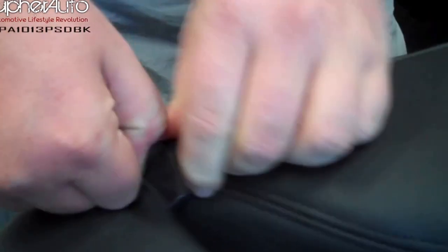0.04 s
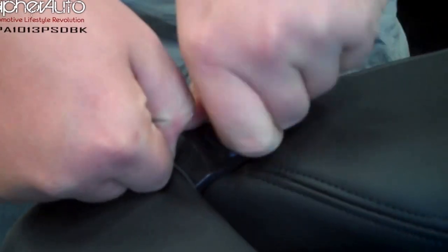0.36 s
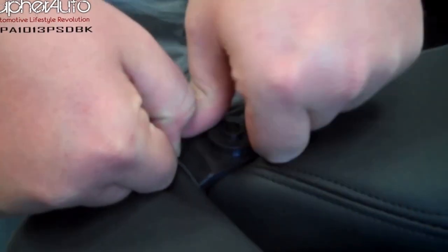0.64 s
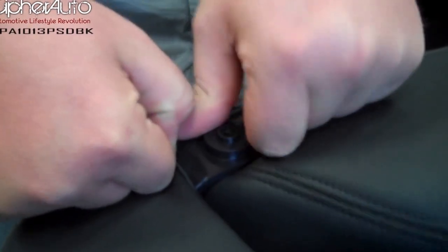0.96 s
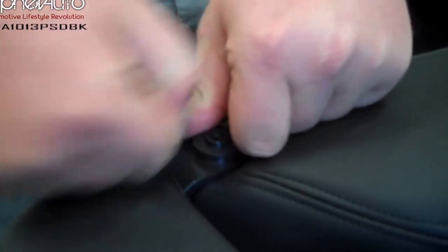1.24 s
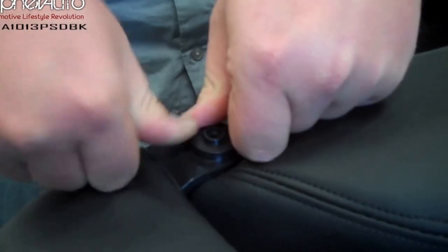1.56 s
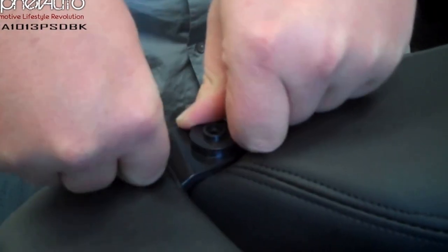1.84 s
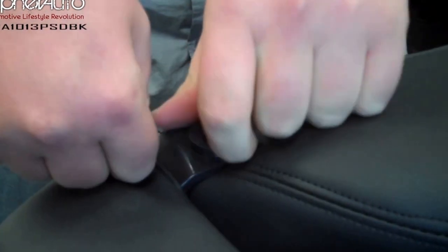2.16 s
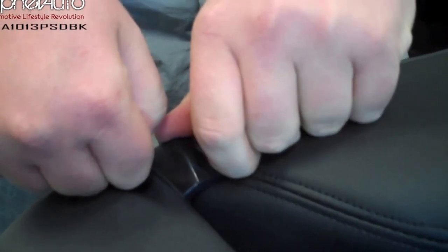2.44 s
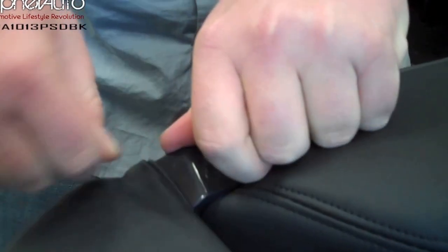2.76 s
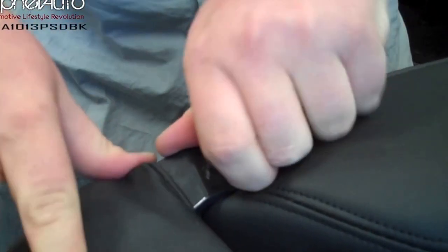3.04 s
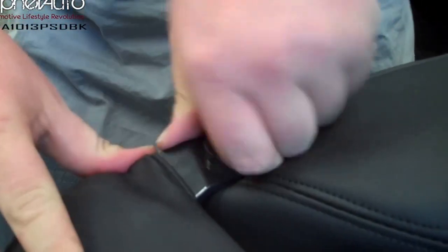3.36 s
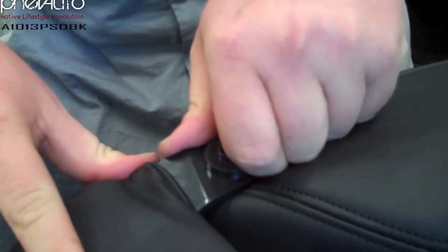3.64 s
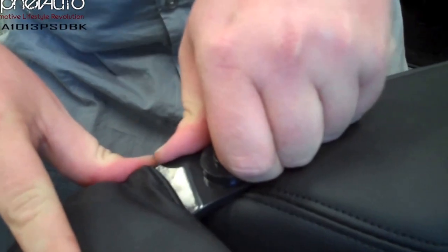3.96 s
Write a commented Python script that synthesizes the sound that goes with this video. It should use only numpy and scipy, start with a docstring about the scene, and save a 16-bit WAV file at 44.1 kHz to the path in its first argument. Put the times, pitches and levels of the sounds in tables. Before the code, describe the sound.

Fingers rubbing and tugging a vinyl seat cover, with dry creaks, ticks and snaps.

```python
"""A quiet room, close on a car seat: two hands stretch a vinyl cover over it, by a small stereo mic.
Skin and vinyl stick and slip: single ticks, and creaks where the slips run together.
Each slip briefly rings the gripped patch. When the grip gives way the cover snaps onto the foam
and the fingers slide off with a dry hiss. Soft room tone and a faint mains hum lie underneath."""
import sys
import numpy as np
from scipy import signal
from scipy.fft import rfft, irfft
from scipy.io import wavfile

SR = 44100
rng = np.random.default_rng(int(sys.argv[2]) if len(sys.argv) > 2 else 0)


def generate_wav(signal):
    """Clip the signal to [-1, 1] and save it as 16-bit WAV at the path in sys.argv[1]."""
    frames = np.transpose(np.atleast_2d(signal))
    scaled = np.clip(frames, -1, 1) * 32767
    pcm = np.round(scaled).astype(np.int16)
    wavfile.write(sys.argv[1], SR, pcm)


N = 176400

# Single slips of skin on vinyl. Levels here and below are relative; tick_db is on top of level_db.
# start_s, level_db, tick_db, grip
SINGLE_SLIPS = [ (0.016, -34, -7, "thumb"), (0.6525, -21, -14.5, "taut"), (0.7374, -26.5, -5, "taut"),
                (.7910, -21, -11, "tug"), (0.8029, -16.5, -14, "tug"), (0.8192, -19, -13, "tug"),
                (0.9406, -19.5, -5.5, "fold"), (0.9543, -22, -1, "fold"), (0.968, -22.5, -2, "fold"),
                (1.004, -23, -7.5, "pinch"), (1.0367, -22.5, -10.5, "pinch"), (1.106, -16, -20, "fingers"),
                (1.2051, -24.5, -17, "fingers"), (1.2779, -22.5, -18, "pinch"), (1.4189, -25, -3, "edge"),
                (1.6181, -32, -15, "edge"), (1.6489, -32.5, 5, "thumb"), (1.6859, -29.5, 3.5, "thumb"),
                (1.7373, -28, -1.5, "thumb"), (1.9474, -30.5, 5, "fingers"), (2.2072, -45, 15.5, "thumb"),
                (2.2827, -30.5, -8.5, "taut"), (2.3004, -25, -8.5, "taut"), (2.3454, -27, -9, "taut"),
                (2.3665, -28, -10, "taut"), (2.9525, -36, 0.5, "thumb"), (3.0610, -25, -1.5, "thumb"),
                (3.443, -43.5, 6.5, "thumb"), (3.7751, -38, 5.5, "thumb"), (3.7910, -33.5, 0, "thumb"), ]

def ticks():
    """Under a slow pull the slips come one at a time."""
    out = np.zeros(N)
    for start, level_db, tick_db, grip in SINGLE_SLIPS:
        add(out, start, undb(level_db) * flutter(slip(grip, tick_db)))
    return out


# Runs of slips, each gliding through three slip rates.
# start_s, end_s, first_rate_hz, middle_rate_hz, last_rate_hz, level_db, tick_db, grip
CREAK_RUNS = [ (0.07, 0.0908, 379, 439.7, 304, -31, -6.5, "fingers"),
              (0.0933, 0.132, 187.3, 259, 144.7, -30.5, -4.5, "fingers"),
              (0.149, 0.1943, 99.6, 125.8, 287.5, -26.5, -10, "fingers"),
              (0.198, 0.247, 420, 398, 301, -35.5, -25, "fingers"),
              (0.3305, 0.3734, 194, 221, 276, -33, 0, "fingers"),
              (.6683, .7230, 112.3, 193.4, 167, -25, -9.5, "taut"),
              (1.0134, 1.0278, 156.6, 154, 151.4, -21, -11.5, "pinch"),
              (1.0961, 1.1525, 275.4, 422, 182.4, -25, -11, "pinch"),
              (1.9000, 1.9330, 114.3, 155, 77.5, -34, -6.5, "thumb"),
              (2.3958, 2.4416, 99.74, 72, 109.3, -28, -8.5, "taut"),
              (2.4508, 2.5100, 191.5, 191.8, 235, -29.5, -11, "stretched"),
              (3.119, 3.125, 422.7, 454, 420, -30.5, -8, "fingers"),
              (3.202, 3.2407, 203.2, 174.2, 82.6, -31, -7.5, "thumb"),
              (3.279, 3.316, 117.9, 160, 132.6, -28.5, -3, "thumb"),
              (3.337, 3.3544, 102, 91.5, 86, -32, -0.5, "thumb"),
              (3.608, 3.6500, 238, 158.1, 114.3, -28.5, -7.5, "flat"),
              (3.656, 3.6963, 226, 327.8, 240.9, -31.5, -7, "flat"),
              (3.7002, 3.749, 135, 72.3, 65.3, -35, -8.5, "flat"), ]

def creaks(gap_scatter=.04, size_scatter_db=.5, stick_power=.26):
    """Under a faster pull the slips run together, at a rate that follows the hand's speed."""
    out = np.zeros(N)
    for start, end, first, middle, last, level_db, tick_db, grip in CREAK_RUNS:
        t = np.linspace(start, end, 200)
        rate = np.interp(t, np.linspace(start, end, 3), [first, middle, last])
        cycles = np.cumsum(rate) * (t[1] - t[0])
        count = max(int(round(cycles[-1])), 1) + 1
        gap_jitter, size_jitter = rng.standard_normal((count, 2)).T
        times = np.interp(np.linspace(0, cycles[-1], count) + gap_scatter * gap_jitter, cycles, t)
        stick = rate.mean() / np.interp(times, t, rate)  # a longer stick gives a stronger slip
        sizes = stick ** stick_power * undb(level_db + size_scatter_db * size_jitter)
        for at, size in zip(times, sizes):
            add(out, at, size * flutter(slip(grip, tick_db)))
    return out


# The cover snapping free: a crack over a low thud.
# start_s, crack_db, tick_db, thud_db, thud_pitch_hz
COVER_SNAPS = [(1.1619, -19, -12.5, -22, 700), (1.1642, -19.5, -9, -32, 242), (1.1784, -26, 6.5, -43, 171),
               (2.5158, -33, 5, -42, 431.5), (2.517, -21.5, -16, -32.5, 364),
               (2.5328, -24, -14, -39, 201.5), (2.5375, -23, -3.5, -44, 358)]

def snaps(thud_trim_db=-6.5):
    """The grip lets go: the cover cracks and thuds onto the foam."""
    out = np.zeros(N)
    for start, crack_db, tick_db, thud_db, thud_hz in COVER_SNAPS:
        resonance = ring(thud_hz, width_hz=220)
        thud = signal.fftconvolve(resonance, resonance)[:len(resonance)]  # twice, for steep flanks
        add(out, start, undb(crack_db) * flutter(slip("fingers", tick_db)))
        add(out, start, undb(thud_db + thud_trim_db) * thud / strength(thud))
    return out


# Resonances of the vinyl patch, a set for each way of holding it.
# pitch_hz, width_hz, level_db
GRIP_RESONANCES = { "fingers": [(586, 860, -11), (1020, 470, -6), (2610, 1780, 1)], "taut": [(993, 620, -1),
                   (1660, 560, -1.5), (2560, 990, -1.5)], "stretched": [(948.5, 665, -3), (1940, 1050, 1),
                   (4740, 4500, -12)], "tug": [(1000, 640, -7.5), (1700, 780, -7), (2690, 790, 1.5)],
                   "fold": [(855.7, 640, -6.5), (1490, 1060, 7.5), (2970, 650, 8.5), (4160, 750, 0)],
                   "pinch": [(663, 750, -22), (1100, 1270, -5.5), (2750, 840, 8), (3713, 1100, -4.5)],
                   "thumb": [(650, 600, 2), (1000, 470, 6.5), (1720, 440, 1.5), (2730, 2140, 0.5)],
                   "flat": [(700, 560, 0), (980, 686, 1), (3020, 1010, 1.5)], "edge": [(735, 1000, -8.5),
                   (2187, 1120, 3)], }

def patch(grip, tension_scatter=.047, size=1024):
    """Dry knock of the gripped patch: broad resonances that shift with the tension of the moment."""
    tuning = 1 + tension_scatter * rng.standard_normal()  # a little tighter or slacker each time
    f = np.maximum(np.fft.rfftfreq(size, 1 / SR), 10) / tuning
    pitch_hz, width_hz, level_db = np.array(GRIP_RESONANCES[grip]).T[:, :, None]
    detune = (f - pitch_hz ** 2 / f) / width_hz
    knock = causal(np.linalg.norm(undb(level_db) / (1 + detune ** 2), axis=0))
    swell = np.prod((1 - 1j * detune) / (1 + 1j * detune), axis=0)  # all-pass: each resonance blooms
    return irfft(rfft(knock) * swell)


def slip(grip, tick_db, trim_db=-6, low_cut_hz=158):
    """One release of the contact: a sharp tick and the short ring of the patch."""
    body = bend(patch(grip), lag_s=.00019)
    tick = bend(ring(8400, width_hz=7200, size=len(body)), lag_s=.001597)
    sound = (body + undb(tick_db) * tick) / strength(body)
    return undb(trim_db) * signal.lfilter(*signal.butter(1, low_cut_hz, "high", fs=SR), sound)


def bend(x, lag_s):
    """Bending waves in the sheet: the treble arrives first, the lows later; lag_s holds at 1 kHz."""
    turns = 2 * lag_s * np.sqrt(1000 * np.fft.rfftfreq(len(x), 1 / SR))
    return irfft(rfft(x) * np.exp(-2j * np.pi * turns))


def flutter(x, decay_s=.0016, level_db=-7, size=256):
    """The sheet shivers for a moment, differently after each slip."""
    shiver = rng.standard_normal(size) * np.exp(-np.arange(size) / SR / decay_s)
    response = signal.unit_impulse(size) + undb(level_db) * shiver / np.linalg.norm(shiver)
    return np.convolve(x, response)[:len(x)]


# Tone of sliding skin: a bright hiss and a darker rasp.
# frequency_hz, gain_db
HISS_EQ = [(150, -26.5), (1500, -3.5), (3500, -3.5), (6500, 8), (10000, 4.5), (14000, -5.5)]
RASP_EQ = [(200, -19), (600, 0.5), (1000, 2.5), (1700, -3.5), (3000, 0), (6000, -14)]
# Finger strokes across the cover, each swelling and fading; the short burst at 2.5138 s is the grainy crack of
# the cover snapping free. # start_s, loudest_s, end_s, hiss_db, rasp_db
STROKES = [ (-.08, 0.06, 0.23, -54, -55), (0.156, 0.22, 0.27, -42.5, -45.5),
           (0.209, 0.265, 0.2845, -36, -75), (0.265, 0.287, 0.43, -52, -56.5),
           (0.319, 0.348, 0.395, -51.5, -49), (0.405, 0.495, 0.52, -45.5, -51.5),
           (1.154, 1.177, 1.21, -37, -42), (1.529, 1.528, 1.556, -49.5, -62), (1.59, 1.643, 1.72, -50, -58),
           (1.701, 1.718, 1.816, -50, -57), (1.809, 1.913, 2, -59.5, -61),
           (1.904, 2.08, 2.096, -44.5, -58.5), (2.073, 2.073, 2.35, -48, -65.5),
           (2.5138, 2.5146, 2.522, -26.5, -50), (2.505, 2.568, 2.66, -43.5, -44),
           (2.78, 2.835, 2.862, -51, -61), (2.86, 2.888, 2.92, -54, -65), (2.935, 2.98, 3.07, -52, -48.5),
           (3.068, 3.072, 3.2, -43.5, -51), (3.15, 3.2, 3.285, -43.5, -50), (3.26, 3.31, 3.38, -48, -52),
           (3.5, 3.7, 3.82, -54, -59), (3.795, 3.825, 3.856, -49, -58), (3.868, 3.892, 3.935, -52, -68), ]

def slides(trim_db=1, grain_db=1, grains_per_s=530, lean_left_db=.5):
    """Skin glides over the grain of the vinyl: a gritty hiss, with a lower rasp where it presses."""
    t = np.arange(N) / SR
    hiss, rasp = np.zeros(N), np.zeros(N)
    for start, loudest, end, hiss_db, rasp_db in STROKES:
        ramp = np.interp(t, np.sort([start, loudest, end]), [0, 1, 0])
        speed = np.sin(np.pi / 2 * ramp) ** 2
        hiss += undb(hiss_db + trim_db) * speed
        rasp += undb(rasp_db + trim_db) * speed
    bumps = np.interp(t * grains_per_s, np.arange(N), rng.standard_normal(N))
    grain = unit(undb(grain_db * bumps))
    pan = undb(np.array([[lean_left_db], [-lean_left_db]]) / 2)
    return grain * (hiss * pan * noise(HISS_EQ, width=.24) + rasp * noise(RASP_EQ, width=.027))


def crinkle(slips_per_s=70, floor_db=-53.5, spread_db=3.5):
    """Tiny stray slips while the fingers slide, most of them faint."""
    out = np.zeros(N)
    sounds = [slip(grip, tick_db=-5) for grip in GRIP_RESONANCES]
    for when, faintness, which in rng.random((int(slips_per_s * N / SR), 3)):
        at = when * N / SR
        if any(start < at < end for start, _, end, _, _ in STROKES):
            level_db = floor_db - spread_db * np.log(max(faintness, .02))
            add(out, at, undb(level_db) * sounds[int(which * len(sounds))])
    return out


def room(x, t60_s=.11, wet_db=-19.5):
    """The room answers with a faint, short tail, different on each side."""
    t = np.arange(SR // 2) / SR
    tails = rng.standard_normal((2, len(t))) * np.exp(-np.log(1000) * t / t60_s)
    wet = [through(side, tail / np.linalg.norm(tail)) for side, tail in zip(x, tails)]
    return undb(wet_db) * np.array(wet)


# Tone of the room's air.
# frequency_hz, gain_db
AIR_EQ = [(40, -8.5), (160, -5.5), (330, 2), (800, -0.5), (4000, -4.5), (14000, -4.5)]

def room_tone(air_db=-59, hum_hz=118, hum_db=-84):
    """Steady room hiss and a faint mains hum."""
    hum = np.sqrt(2) * np.sin(2 * np.pi * hum_hz * np.arange(N) / SR)
    return undb(air_db) * noise(AIR_EQ, width=.5) + undb(hum_db) * hum


def undb(db):
    """Decibels to gain."""
    return 10 ** (np.asarray(db) / 20)


def unit(x):
    """Scale to rms 1."""
    return x / np.sqrt(np.mean(x ** 2))


def strength(response):
    """Rms that a response would have if it lasted one millisecond."""
    return np.sqrt(np.sum(response ** 2) / (SR / 1000))


def add(out, at, sound, rise_s=.0005):
    """Mix a short sound in, starting rise_s ahead of its cue."""
    i = max(int(round((at - rise_s) * SR)), 0)
    part = out[i:i + len(sound)]
    part += sound[:len(part)]


def through(x, response):
    """Pass a sound through an impulse response."""
    return signal.fftconvolve(x, response)[:N]


def ring(pitch_hz, width_hz, size=2048):
    """Impulse response of one damped resonance, gain 1 at its centre."""
    g, k = np.tan(np.pi * pitch_hz / SR), width_hz / pitch_hz
    feedback = [1 + g * k + g * g, 2 * (g * g - 1), 1 - g * k + g * g]
    return signal.lfilter([g * k, 0, -g * k], feedback, signal.unit_impulse(size))


def causal(gain):
    """Shortest causal impulse response with these gains at evenly spaced frequencies."""
    cepstrum = irfft(np.log(gain))
    half = len(cepstrum) // 2
    cepstrum[1:half] *= 2
    cepstrum[half + 1:] = 0
    return irfft(np.exp(rfft(cepstrum)))


def colour(eq, size=2048):
    """Causal impulse response of an EQ curve."""
    hz, db = np.array(eq, float).T
    f = np.maximum(np.fft.rfftfreq(size, 1 / SR), 1)
    return causal(undb(np.interp(np.log(f), np.log(hz), db)))


def noise(eq, width):
    """Coloured stereo noise; width is the side against the mid."""
    mid, side = (unit(through(rng.standard_normal(N), colour(eq))) for _ in range(2))
    return unit(np.array([mid + width * side, mid - width * side]))


def scene():
    """The hands on the cover, in the room."""
    bed = room_tone()
    hands = slides() + ticks() + snaps() + creaks() + crinkle()
    return hands + room(hands) + bed


# Treble colour of the two microphone ports, left then right.
# frequency_hz, gain_db
PORT_EQS = [
    [(3000, 2), (4300, 5), (5400, 0), (6400, 3), (7400, 11.5), (8600, 2), (10500, -5.5), (13900, -0.5),
     (15200, -19)],
    [(3000, 1.5), (4300, 5.5), (5400, 11.5), (6200, 14.5), (7300, 2), (8600, -6.5), (10500, -11.5),
     (13900, -10.5), (15200, -18.5)],
]

def record(dry, high_cut_hz=16200):
    """Each microphone port rings at its own treble pitch and the top is cut."""
    heard = np.array([through(side, colour(eq)) for side, eq in zip(dry, PORT_EQS)])
    heard[0] = np.append(0, heard[0, :-1])  # the left port is a little farther away
    return signal.sosfilt(signal.ellip(8, .2, 70, high_cut_hz, fs=SR, output="sos"), heard)


dry = scene()
out = record(dry)
generate_wav(out)
```